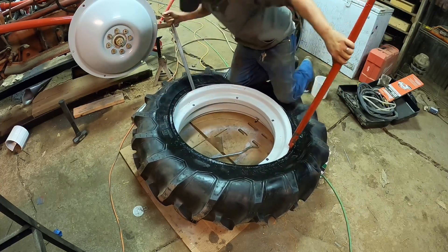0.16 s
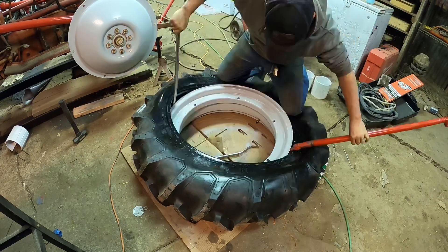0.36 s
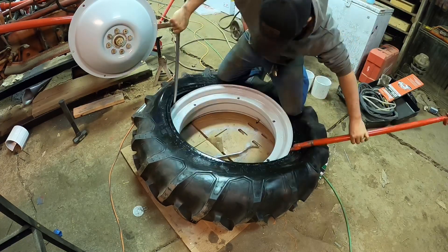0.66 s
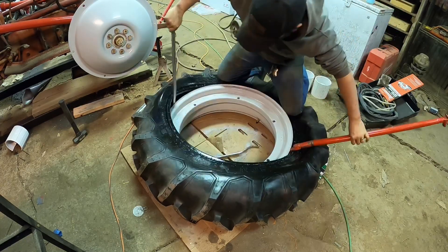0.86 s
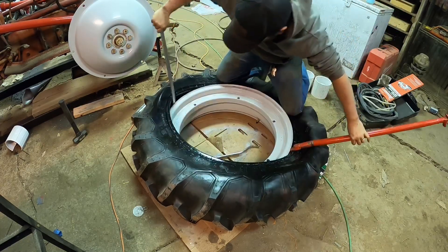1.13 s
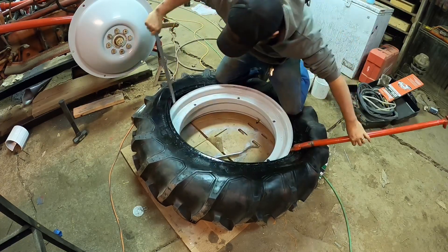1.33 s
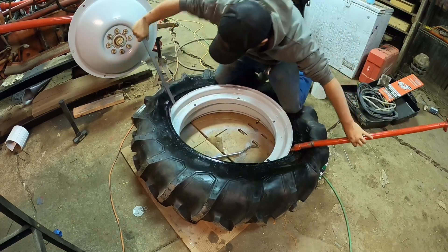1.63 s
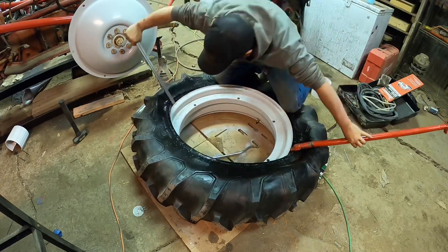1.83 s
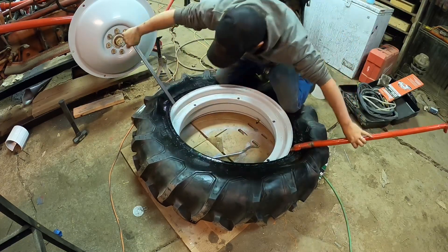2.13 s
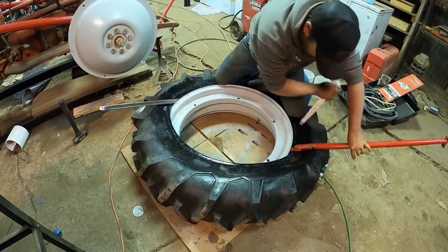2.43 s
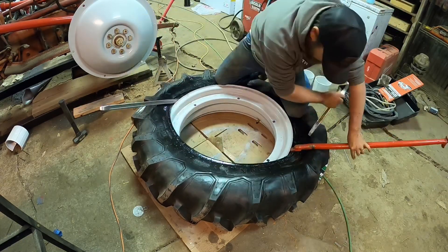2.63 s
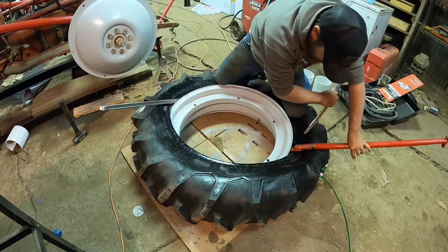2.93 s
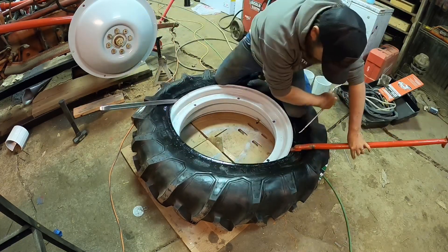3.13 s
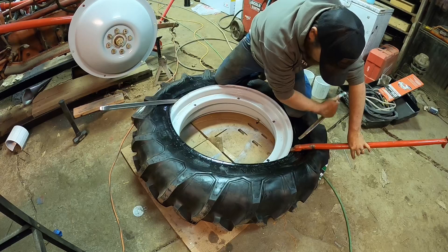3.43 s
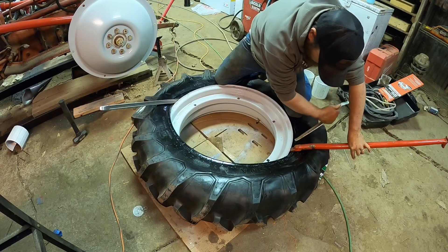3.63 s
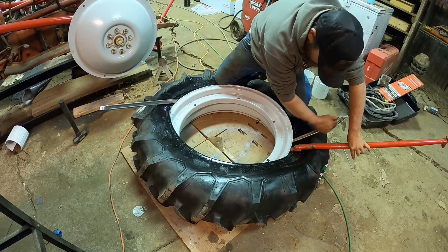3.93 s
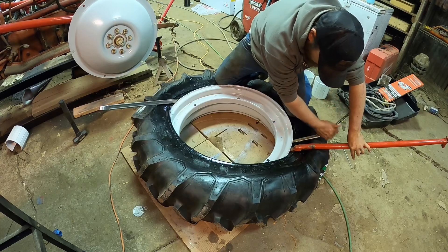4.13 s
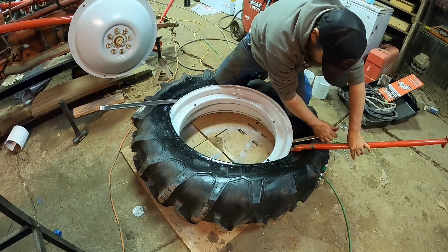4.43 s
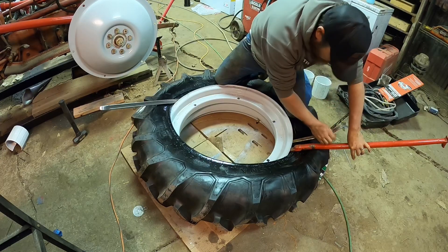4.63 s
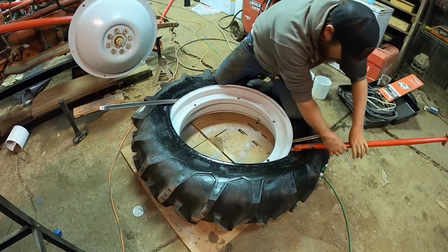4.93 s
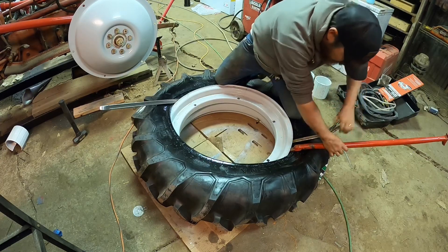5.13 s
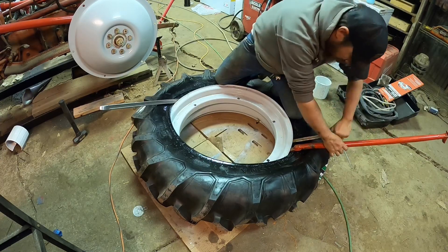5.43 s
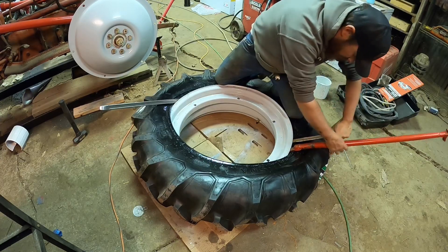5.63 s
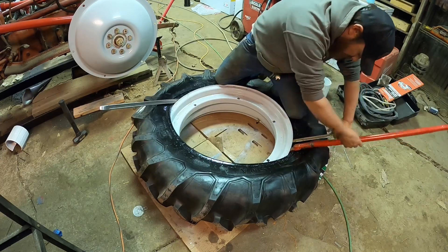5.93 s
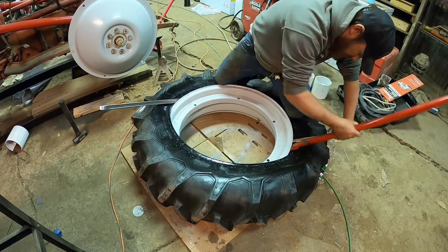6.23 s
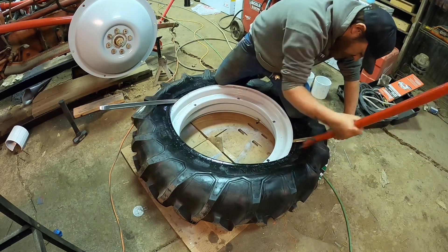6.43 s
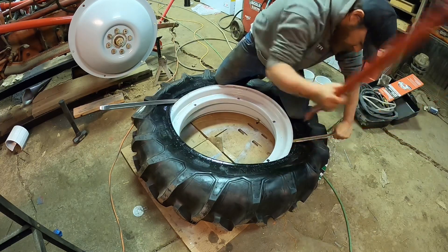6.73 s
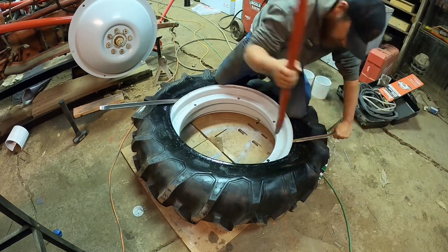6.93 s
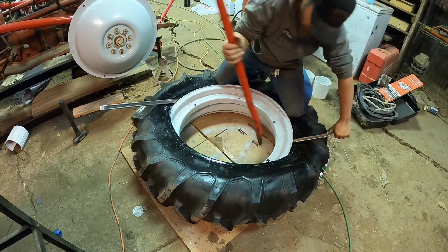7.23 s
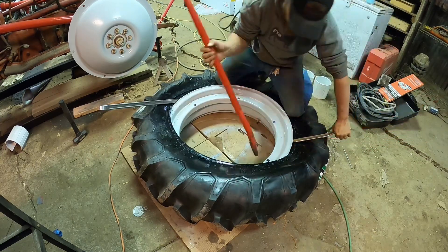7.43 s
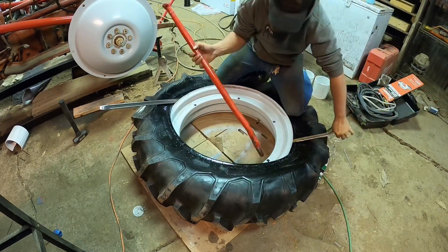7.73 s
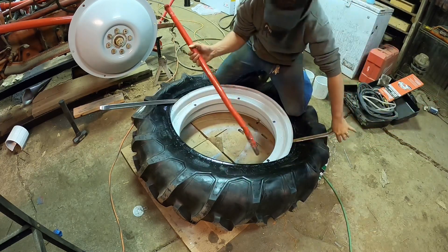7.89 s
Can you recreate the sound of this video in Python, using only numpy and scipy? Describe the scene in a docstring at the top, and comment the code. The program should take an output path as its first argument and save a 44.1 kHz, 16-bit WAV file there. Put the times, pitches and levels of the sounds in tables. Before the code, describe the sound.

Deep rubber thuds and rough metallic knocks burst from a big tire being levered onto its rim, then a ringing bar clang and rustling clothes.

```python
"""First a light tick, a soft thump and rustling clothes are heard over the quiet hiss and whine of a workshop.
Then steel tire irons lever a tractor tire onto its rim: irons slip and knock, and noise makes the chatter.
Decaying tones ring for the rim, an iron or a long pry bar; low tones and noise thump for the rubber.
The wedged lever judders in rough notes, and a decaying noise tail lets the hard room answer the work."""
import sys
import numpy as np
from scipy import signal
from scipy.fft import rfft, irfft
from scipy.io import wavfile
from scipy.ndimage import uniform_filter1d, minimum_filter1d

SR = 44100
rng = np.random.default_rng(int(sys.argv[2]) if len(sys.argv) > 2 else 0)


def waveform_to_disk(signal):
    """Save audio, clipped to [-1, 1], as 16-bit WAV at the path in sys.argv[1]."""
    frames = np.transpose(np.atleast_2d(signal))
    scaled = np.clip(frames, -1, 1) * 32767
    samples = np.round(scaled).astype(np.int16)
    wavfile.write(sys.argv[1], SR, samples)


N = 355424
TIME = np.arange(N) / SR
LEAD_S, BLOW_S = 0.05, 1.1  # time kept for the build-up, and whole length of one event
AGE = np.arange(int(BLOW_S * SR)) / SR - LEAD_S  # seconds since an event landed


def amp(db):
    """Turn decibels into a gain."""
    return 10 ** (np.asarray(db) / 20)


def unit(x):
    """Scale a sound to rms 1."""
    return x / np.sqrt(np.mean(x ** 2))


def at(points, hz):
    """Read a table over frequency, with straight lines between points on a log axis."""
    f, value = np.transpose(points)
    return np.interp(np.log(np.maximum(hz, 1)), np.log(f), value)


def tilt(hz, slope_db):
    """A harder contact lifts the treble above 900 Hz, a softer one dulls it (dB)."""
    return slope_db * np.log2(np.maximum(hz, 900) / 900)


# how far the two microphone ports differ: (frequency [Hz], side minus mid [dB])
PORT_WIDTH = [(60, -26), (125, -23), (250, -17), (500, -11), (1000, -9), (2000, -6), (4000, -5), (10000, 0)]


def ports(mid, side, hz, wide_db):
    """Left and right are alike in the bass and grow unrelated toward the treble."""
    width = amp(np.minimum(at(PORT_WIDTH, hz) + wide_db, 0))
    return np.array([mid + width * side, mid - width * side]) / np.sqrt(1 + width ** 2)


def noise(colour, size, slope_db=0, wide_db=0):
    """Stereo noise with random phases and a given colour, rms 1."""
    hz = np.fft.rfftfreq(size, 1 / SR)
    mid, side = np.exp(2j * np.pi * rng.random((2, len(hz))))
    gain = amp(at(colour, hz) + tilt(hz, slope_db))
    return unit(irfft(ports(mid, side, hz, wide_db) * gain, size))


def flicker(size, rate, depth_db):
    """A gain that wanders at random, with `rate` new values a second, rms 1."""
    t = np.arange(size) / SR * rate
    wander = np.interp(t, np.arange(2 ** 12), rng.standard_normal(2 ** 12))
    return unit(amp(depth_db * wander))


def swell(slip, t60, hold=0):
    """Envelope: it builds while the iron slips, holds during contact, then falls 60 dB in t60."""
    rise = np.minimum(AGE, 0) / max(slip, 1e-5)
    fall = np.log(1000) * np.maximum(AGE - hold, 0) / t60
    return np.exp(rise - fall)


def ring(modes, slip, slope_db=0):
    """Decaying modes of unit total strength; each reaches the two ports with its own phase lag."""
    out, power = 0, 0
    for (hz, db, t60), (turn, way) in zip(modes, rng.random((len(modes), 2))):
        gain = amp(db + tilt(hz, slope_db))
        lag = np.arctan(amp(at(PORT_WIDTH, hz))) * (way + 0.66)
        phase = 2 * np.pi * (hz * AGE + turn)
        wave = np.sin(np.float32(phase + np.array([[lag], [-lag]])))
        out = out + gain * swell(slip, t60) * wave
        power += gain ** 2 / 2
    return out / np.sqrt(power)


def resonate(x, modes, width_hz, leak_db):
    """Pass a sound through a body: strong at its modes, weak between them; rms 1."""
    hz = np.fft.rfftfreq(x.shape[1], 1 / SR)
    peaks = 0
    for mode_hz, db, _ in modes:
        distance = (hz - mode_hz) / (width_hz / 2)
        peaks = peaks + amp(db) ** 2 / (1 + distance ** 2) ** 2
    gain = np.sqrt(peaks + amp(leak_db) ** 2)
    return unit(irfft(rfft(x) * gain, x.shape[1]))


def gestures(rows):
    """Gain over time of soft movements: each swells and fades as a bell curve."""
    return sum(amp(db) * np.exp(-((TIME - s) / half_s) ** 2) for s, half_s, db in rows)


def add(track, s, sound):
    """Mix an event in so that it lands at time s."""
    start = int((s - LEAD_S) * SR)
    a, b = max(start, 0), min(start + sound.shape[1], N)
    track[:, a:b] += sound[:, a - start:b - start]


# colour of the shop's room tone: (frequency [Hz], density [dB per Hz])
SHOP_COLOUR = [(25, -11), (100, -12), (180, -2), (280, -6), (450, -8), (570, -14), (730, -12), (880, -17),
               (1700, -16), (2700, -21), (3800, -25), (7000, -29), (10000, -45), (15000, -58)]


def shop(tone_db=-63, whine_hz=3310, whine_db=-82):
    """Quiet room tone, wider than the work as it comes from all sides, with a thin steady whine."""
    whine = noise([(whine_hz * 0.96, -60), (whine_hz, 0), (whine_hz * 1.04, -60)], N)
    tone = noise(SHOP_COLOUR, N, wide_db=4) * flicker(N, rate=0.83, depth_db=1)
    return amp(tone_db) * tone + amp(whine_db) * whine


# sleeves and trousers rub: (time of the peak [s], half length [s], level [dB])
CLOTH_SWISHES = [(.03, .048, -60), (.285, .012, -64), (.35, .03, -65), (2.355, .04, -61), (6.08, .06, -70),
                 (6.96, .12, -54), (7.19, .08, -58), (7.42, .13, -58), (7.7, .19, -58.5)]
# the tire shifts under the worker's knees: (time of the peak [s], half length [s], level [dB])
TIRE_SHIFTS = [(.08, 0.12, -59), (.45, 0.15, -57), (.85, .2, -66.5), (2.0, 0.1, -58.5), (2.25, 0.24, -58.5),
               (5.385, 0.042, -57.5)]
# colours of rubbing cloth and of the shifting tire: (frequency [Hz], density [dB per Hz])
CLOTH_COLOUR = [(300, -45), (1200, -4), (2500, 0), (4200, -6.5), (6000, -12.5), (9000, -22), (13000, -32),
                (15000, -43)]
RUMBLE_COLOUR = [(20, -8.5), (45, 0), (85, -3.5), (150, -7), (300, -20), (700, -43), (3000, -66.5)]


def movement():
    """Cloth rubs in soft, fluttering swishes and the heavy tire rumbles on its board."""
    cloth = noise(CLOTH_COLOUR, N) * flicker(N, rate=110, depth_db=2.5)
    rumble = noise(RUMBLE_COLOUR, N) * flicker(N, rate=22, depth_db=1.0)
    return cloth * gestures(CLOTH_SWISHES) + rumble * gestures(TIRE_SHIFTS)


# light contacts of the tools: (time [s], level of click and snap together [dB], iron ring level [dB],
# click brightness [dB per octave], share sent to the room [dB], snap inside the click [dB])
TOOL_TICKS = [(.008, -47, -70, -1, 0, -6), (.7219, -34, -84, 1.8, -1, 7), (1.407, -49, -70, 3, -10, -6),
              (1.535, -58, -72, 8, -10, -6), (1.914, -55, -75, 5.5, -8, 3), (4.242, -56, -64, -3, 0, -6),
              (4.723, -62, -61, -1, -4, -4), (4.8, -68, -66, 1, -4, -4), (4.826, -68, -63, 1, -4, -4),
              (5.028, -66, -65, 1, -4, -4), (5.085, -68, -64, 1, -4, -4), (5.2394, -61, -72, -1, -4, 0),
              (6.2391, -57, -69, 0, -5, -3), (6.275, -67, -76, 3, -4, -4), (6.36, -64, -76, 3, -4, -4),
              (7.3895, -55, -76, 1, -4, -3), (7.464, -65, -76, 5, -4, -3)]
# colour of a click: (frequency [Hz], density [dB per Hz])
CLICK_COLOUR = [(100, -22.5), (300, -4), (500, 0.5), (750, -11), (1050, -7.5), (2100, -1), (3000, -1),
                (4000, -7), (6000, -12), (7700, -11.5), (9800, -24), (11000, -46), (15000, -66.5)]
# modes of a hand-held iron under a light touch: (frequency [Hz], level [dB], t60 [s])
LIGHT_IRON_MODES = [(4170, -1, .13), (4205, 0, .17), (4544, -3, .14), (5303, -9, .12), (6293, -11, .13)]


def ticks(rise_s=0.0003, click_t60_s=0.06, snap_t60_s=0.012):
    """A snap, a short click and a faint iron ring damped by the hand; also returns the room's share."""
    direct, sent = np.zeros((2, N)), np.zeros((2, N))
    for s, click_db, iron_db, slope_db, room_db, snap_db in TOOL_TICKS:
        envelope = 1.7 * swell(rise_s, click_t60_s) + amp(snap_db) * swell(rise_s, snap_t60_s)
        click = noise(CLICK_COLOUR, len(AGE), slope_db) * envelope
        tick = amp(click_db) * click + amp(iron_db) * ring(LIGHT_IRON_MODES, 0)
        add(direct, s, tick)
        add(sent, s, amp(room_db) * tick)
    return direct, sent


# the rubber bead jumps: (time [s], carcass level [dB], carcass pitch once relaxed [Hz], carcass t60 [s],
# air chamber level [dB], air chamber pitch [Hz], time of the push [s])
BEAD_THUMPS = [(0.012, -44.5, 82.3, 0.37, -64, 150, .004), (0.342, -48, 80, 0.11, -55, 178, 0.0041),
               (1.139, -9.5, 107.7, 0.17, -19, 151.6, 0.0062), (1.393, -16, 78.3, 0.25, -20, 168, 0.0046),
               (1.662, -5.5, 85, 0.18, -18.5, 155, 0.0044), (1.686, -11.5, 84, 0.11, -23.5, 170.2, 0.005),
               (1.815, -16.5, 90, 0.23, -29, 148.8, .006), (1.935, -34, 93, 0.19, -43, 159.7, 0.0055),
               (2.07, -40.5, 81.3, .2, -56.5, 149.4, .008), (4.039, -45, 89, 0.25, -36.5, 152, .005),
               (4.165, -39, 100, 0.23, -50, 151, .01), (4.232, -17, 103.6, 0.12, -25, 149, 0.0073),
               (4.331, -34.5, 102, 0.083, -39, 149, .009), (5.440, -11.5, 124.3, 0.17, -19, 155.3, 0.0046),
               (5.469, -28, 90, .22, -21, 153.3, 0.0088)]
# colour of the rubber's noise: (frequency [Hz], density [dB per Hz])
RUBBER_COLOUR = [(20, -35), (45, -10), (80, 6), (160, 0), (220, -12), (380, -8), (700, -33), (3000, -72)]
# modes of the air inside the tire: (multiple of the chamber pitch, level [dB], t60 [s])
CHAMBER_MODES = [(.44, -13, .25), (.76, -3, .22), (1, 2, .25), (1.08, -3, .25), (1.45, -14, .22),
                 (1.8, -13, .3)]


def thumps(sag=0.12, sag_s=0.0082):
    """The bead snaps over the flange: a soft push swings the carcass and the air inside it."""
    out, age = np.zeros((2, N)), np.maximum(AGE, 0)
    # the stretched rubber starts stiff, and its pitch sags as it relaxes
    swing = age + sag * sag_s * (1 - np.exp(-age / sag_s))
    for s, carcass_db, hz, t60, chamber_db, chamber_hz, push_s in BEAD_THUMPS:
        push = 1 - np.exp(-(age / push_s) ** 2)
        carcass = np.sin(2 * np.pi * hz * swing) + amp(-8.0) * noise(RUBBER_COLOUR, len(AGE))
        carcass = carcass * swell(0, t60)
        # the gap at the bead sets the pitch of the air
        air = ring([(ratio * chamber_hz, db, decay) for ratio, db, decay in CHAMBER_MODES], 0)
        add(out, s, push * (amp(carcass_db) * carcass + amp(chamber_db) * air))
    return out


# colour of the room's echo: (frequency [Hz], density [dB per Hz])
WALL_COLOUR = [(40, -2), (150, 3.5), (400, 0), (1000, 6), (3000, -2), (7000, -0.5), (14000, -2.5)]
# how long the echo lasts: (frequency [Hz], t60 [s])
ECHO_DECAY = [(100, 0.5), (500, 0.56), (2500, 0.62), (5000, 0.6), (10000, 0.4)]


def room(sent, wet_db=-2.5, build_s=0.0083):
    """Concrete floor and walls: a diffuse tail, octave by octave, that dies soonest in the top treble."""
    t, hz = np.arange(SR) / SR, np.fft.rfftfreq(SR, 1 / SR)
    octave = np.log2(np.clip(hz, 2 ** 6, 2 ** 14))
    diffuse = rfft(noise(WALL_COLOUR, SR))
    tail = 0
    for k in range(6, 15):
        band = irfft(diffuse * np.maximum(1 - abs(octave - k), 0), SR)
        tail = tail + band * np.exp(-np.log(1000) * t / at(ECHO_DECAY, 2 ** k))
    tail = tail * (1 - np.exp(-(t / build_s) ** 2))
    # one input channel excites both sides of the tail
    echo = signal.fftconvolve(sent[:1], unit(tail) / np.sqrt(SR), axes=1)[:, :N]
    return amp(wet_db) * echo


def seated(modes, detune=0.014, spread_db=3):
    """Every blow finds the rim loaded differently and strikes another spot: modes shift and change level."""
    chance = rng.standard_normal((len(modes), 2))
    return [(hz * (1 + detune * a), db + spread_db * b, t60)
            for (hz, db, t60), (a, b) in zip(modes, chance)]


# steel on steel: (time [s], slip before the blow [s], time in contact [s], chatter level [dB],
# what is struck, its ring level [dB], iron ring level [dB], brightness [dB per octave])
STEEL_BLOWS = [(1.137, 0.0034, 0.0067, -19.5, "rim", -29, -51, -4.5),
               (1.395, 0.0041, 0.0066, -26.5, "rim", -39, -58, -3.5),
               (1.652, 0.0029, 0.0044, -23, "rim", -42, -60, -1.5),
               (1.664, 0.0062, 0.013, -19.5, "rim", -35, -61, -1.5),
               (1.821, 0.00084, 0.0037, -29.5, "rim", -52, -70, -0.5),
               (4.028, 0.0014, 0.011, -28.5, "rim", -41.5, -32.5, -0.5),
               (5.436, 0.0022, 0.0085, -16, "bar", -16, -52, -0.64),
               (6.408, 0.0069, 0.0052, -30.5, "rim", -40, -63, -3.5)]
# colour of the chatter: (frequency [Hz], density [dB per Hz])
CHATTER_COLOUR = [(100, -6), (250, -5), (450, -7), (750, -9.5), (1100, -5), (1400, -2.5), (2000, -1.5),
                  (2800, -3), (4000, -2.5), (6100, -8.5), (7300, -16), (10500, -29), (12000, -43),
                  (15000, -56)]
# modes of the rim, the long pry bar and a tire iron: (frequency [Hz], level [dB], t60 [s])
RIM_MODES = [(240, -5, .25), (362, -7, .3), (429, -3, .3), (533, -3, .35), (655, -3, .2), (748, -2, .22),
             (838, 1, .45), (908, -4, .5), (988, -1, .55), (1058, 2, .6), (1136, -1, .45), (1250, -6, .4),
             (1302, -6, .4), (1535, -6, .37), (1620, -6, .25), (1755, -2, .3), (1941, 0, .25),
             (2044, -1, .45), (2215, -4, .25), (2358, 0, .3), (2507, -5, .3), (2600, -3, .2),
             (2665, -4, .4), (2782, -2, .25), (3195, -4, .3), (3414, -8, .3), (3920, -10, .2),
             (4390, -12, .2), (4482, -11, .2), (5570, -15, .25), (6190, -16, .25)]
BAR_MODES = [(596, 3, .4), (942, -3, .45), (980, 1, .4), (1052, 0, .45), (1085, -5, .4), (1162, -3, .4),
             (1484, -9, .4), (1603, -7, .38), (1696, -6, .42), (1776, -10, .4), (2098, -7, .4),
             (2181, -11, .35), (2338, -3, .35), (2536, -3, .35), (2738, 2, .28), (2798, -2, .4),
             (3283, -3, .25), (3321, -7, .35), (3410, -5, .22), (3619, -5, .22), (3765, -5, .42),
             (3949, -12, .35), (4465, -8, .45), (4610, -5, .42), (4807, -12, .4), (5079, -9, .4),
             (5392, -10, .4), (5435, -10, .42), (5900, -10, .38), (6109, -12, .38), (6885, -23, .35)]
IRON_MODES = [(524, -5, .2), (624, -6, .3), (852, -4, .2), (982, -3, .34), (1267, -6, .25), (1591, -3, .3),
              (2080, -4, .28), (2325, -2, .25), (3020, -9, .35), (3150, -5, .25), (3274, -4, .2),
              (3385, -2, .26), (4075, 0, .24), (4108, -2, .26), (5303, -9, .26)]


def blows(chatter_t60_s=0.075):
    """Steel chatters over steel, and the rim or the long bar and the iron ring on."""
    out, size = np.zeros((2, N)), len(AGE)
    for s, slip, hold, chatter_db, struck, body_db, iron_db, slope_db in STEEL_BLOWS:
        modes = seated(RIM_MODES) if struck == "rim" else BAR_MODES
        scrape = resonate(noise(CHATTER_COLOUR, size, slope_db), modes, width_hz=100, leak_db=-12)
        chatter = scrape * swell(slip, chatter_t60_s, hold)
        # the tire loads the steel unevenly and splits each mode into a crowd of close ones
        crowd = resonate(noise(CHATTER_COLOUR, size, slope_db), modes, width_hz=70, leak_db=-15)
        crowd = crowd * swell(slip, t60=0.5, hold=0.02)
        body = amp(-12) * ring(modes, slip, slope_db) + amp(-5.5) * crowd
        iron = ring(IRON_MODES, slip, slope_db)
        add(out, s, amp(chatter_db) * chatter + amp(body_db) * body + amp(iron_db) * iron)
    return out


def cluster(hz, spread):
    """A tone whose pitch and size tremble as the lever shifts in its seat; rms 1."""
    knots = np.arange(-500, 3000)
    steps = rng.uniform(-0.5, 0.39, len(knots))
    drift = np.interp(AGE * hz * spread, knots, np.cumsum(steps))  # in cycles
    tone = np.sin(2 * np.pi * (hz * AGE + drift))
    return unit(tone * flicker(len(AGE), rate=69, depth_db=8.0))


# the wedged lever judders: (time of the peak [s], rise [s], rough pitch [Hz], note level [dB],
# note t60 [s], after-ring level [dB])
LEVER_JUDDERS = [(1.145, 0.0033, 770, -23, 0.07, -38), (1.147, .004, 840, -18, 0.057, -32),
                 (1.152, .004, 1017, -21.5, 0.084, -35.5), (1.402, 0.0065, 746, -14.5, 0.035, -35.5),
                 (1.653, .002, 722, -21.5, 0.057, -50), (1.672, 0.0066, 637, -28, .04, -42.5),
                 (4.036, 0.0034, 1000, -30.5, 0.039, -51), (4.054, 0.0093, 284.4, -22, 0.14, -46),
                 (4.241, 0.0029, 1022, -43.5, 0.042, -59.5), (6.42, 0.0098, 292, -34, 0.093, -55)]


def judders():
    """The wedged lever sticks and slips: a rough note swells, breaks off and leaves a blurred ring."""
    out = np.zeros((2, N))
    for s, rise, hz, db, t60, after_db in LEVER_JUDDERS:
        band = [(hz * 0.5, -90), (hz * 0.93, 0), (hz * 1.07, 0), (hz * 2, -120)]
        blur = noise(band, len(AGE)) * swell(rise, t60=0.45)
        note = cluster(hz, spread=0.2) * swell(rise, t60)
        add(out, s, amp(db) * note + amp(after_db) * blur)
    return out


def scene(pan_db=0.9):
    """Work, echo and room tone together, slightly louder on the left."""
    steel = blows() + judders()
    rubber = thumps()
    small, small_sent = ticks()
    work = steel + rubber + small + movement()
    echo = room(amp(-5.5) * steel + amp(-7.5) * rubber + small_sent)
    left, right = work + echo + shop()
    # sound reaches the right port two samples sooner
    left = np.pad(left, (2, 0))[:N]
    return np.array([left * amp(pan_db / 2), right * amp(-pan_db / 2)])


def limiter(x, limit=0.56, window_s=0.004):
    """Turn the gain down smoothly around peaks that pass the limit."""
    size = int(window_s * SR)
    gain = limit / np.maximum(abs(x).max(axis=0), limit)
    return x * uniform_filter1d(minimum_filter1d(gain, size), size)


# the level dips briefly: (time [s], depth [dB])
LEVEL_DIPS = [(0.312, -12), (2.386, -22.5)]


def record(dry, dip_s=0.012, top_hz=14800):
    """The loudest peaks are limited; the level dips twice, briefly; the top treble is cut."""
    dip_db = sum(db * np.exp(-((TIME - s) / dip_s) ** 2) for s, db in LEVEL_DIPS)
    low_pass = signal.ellip(8, 0.2, 70, top_hz, fs=SR, output="sos")
    return signal.sosfilt(low_pass, limiter(dry) * amp(dip_db))


dry = scene()
out = record(dry)
waveform_to_disk(out)
```